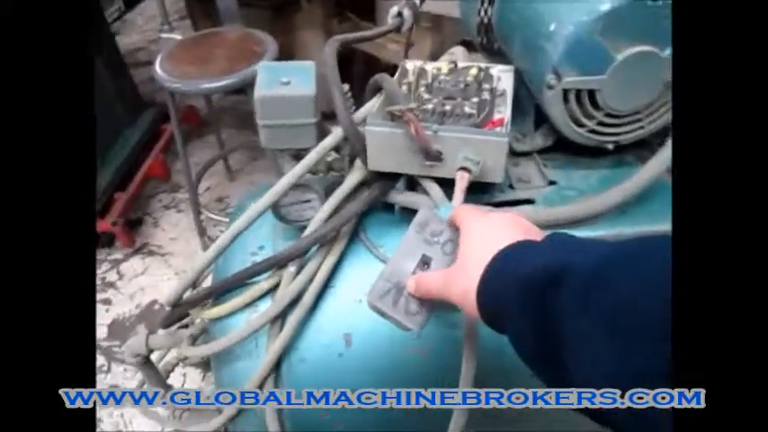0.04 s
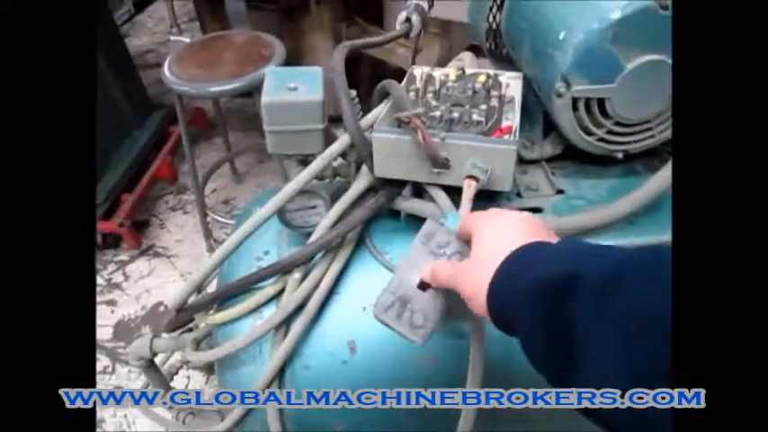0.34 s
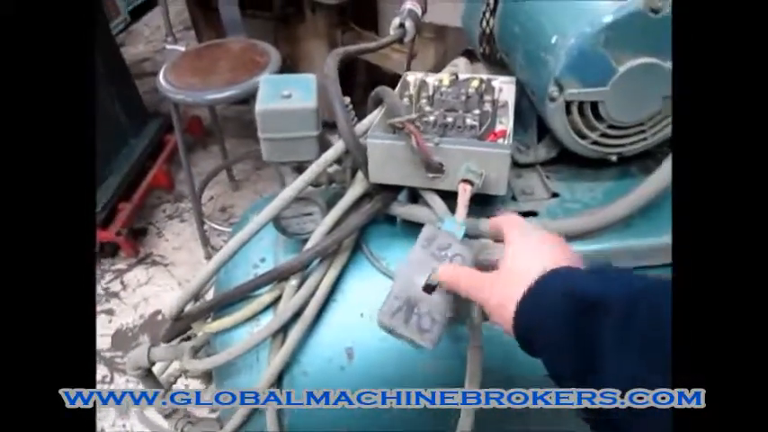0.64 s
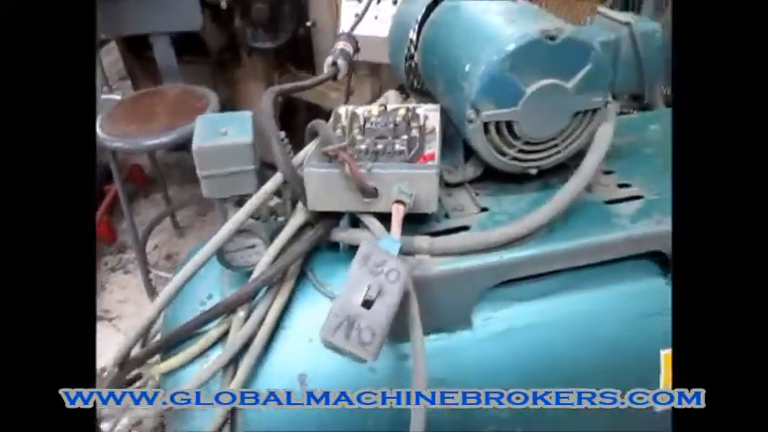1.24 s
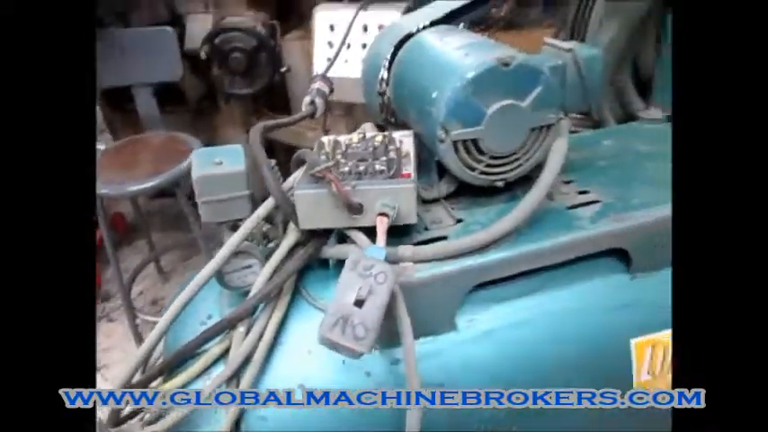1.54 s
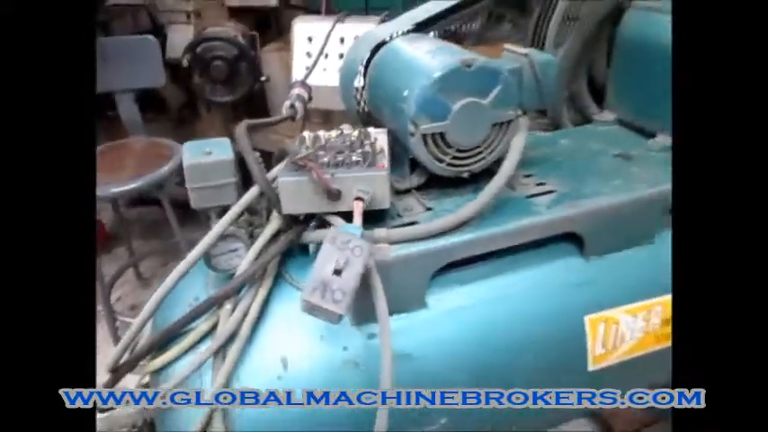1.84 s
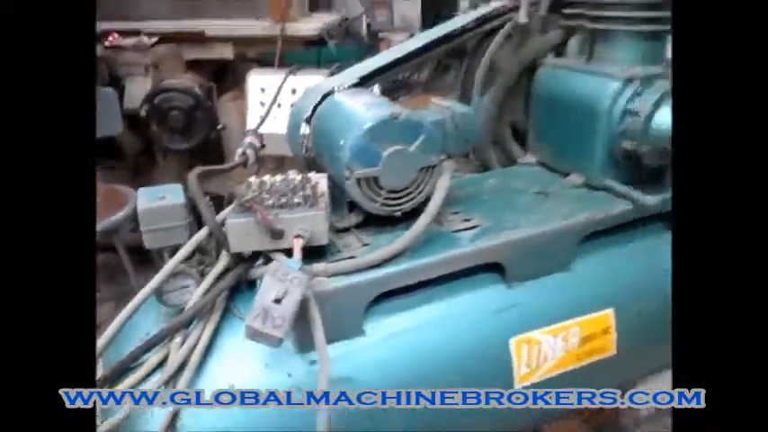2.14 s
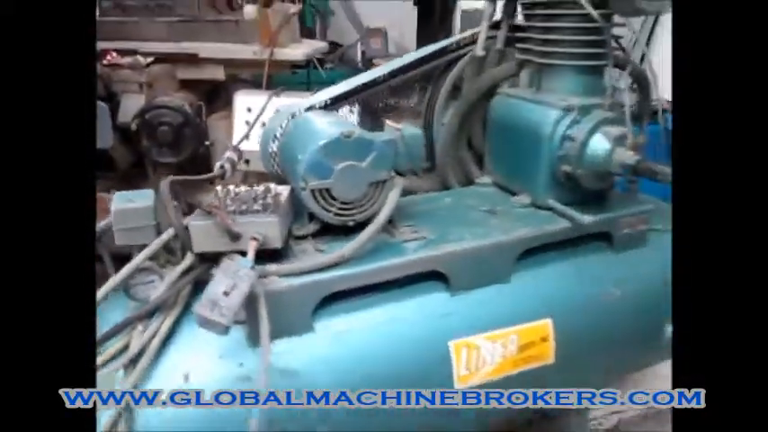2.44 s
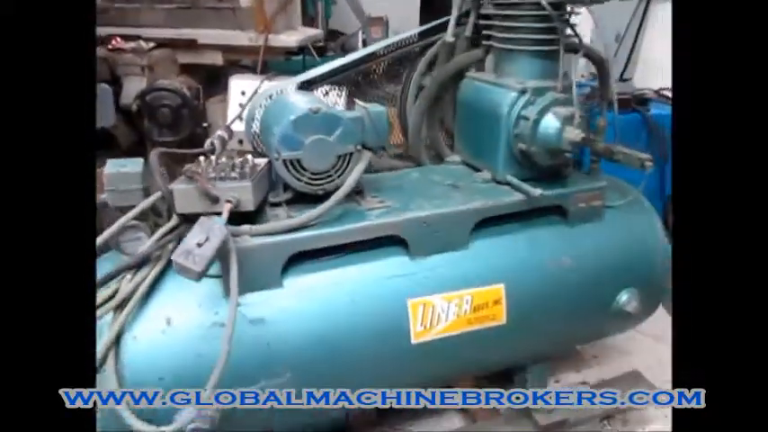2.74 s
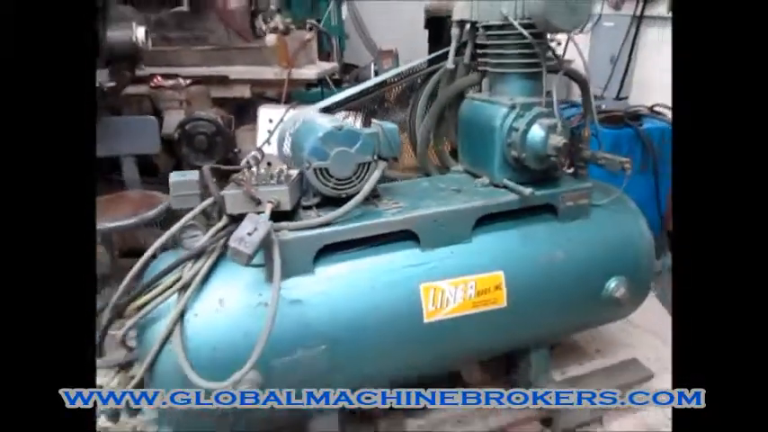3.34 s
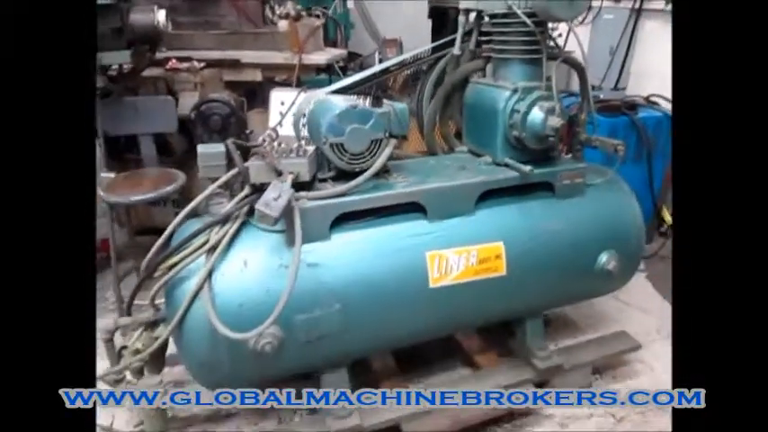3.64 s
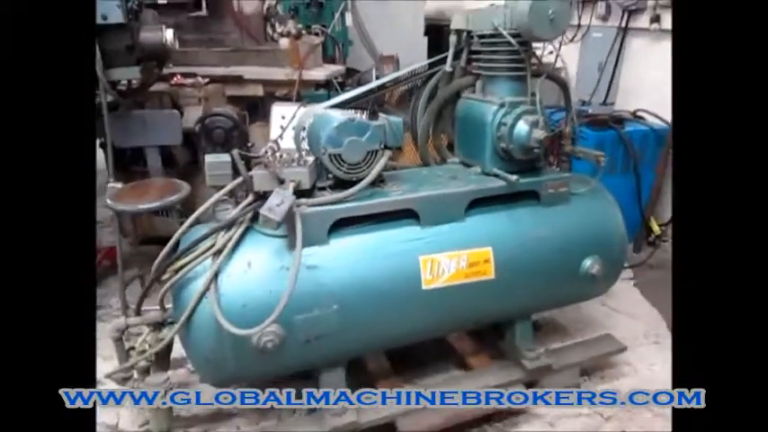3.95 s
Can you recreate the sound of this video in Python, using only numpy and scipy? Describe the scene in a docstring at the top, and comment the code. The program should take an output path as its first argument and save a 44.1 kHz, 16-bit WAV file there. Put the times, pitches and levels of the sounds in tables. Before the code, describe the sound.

An air compressor chugs, is switched off, then lets out a long hiss of air.

```python
"""In a workshop, a belt-driven air compressor chugs: each pump stroke thumps, knocks and rings the tank,
while the motor whines, the drive rattles and the valves tick. The switch snaps off and the strokes slow.
The unloader valve clacks open and lets the air out, its hiss falling in pitch as the pressure drops.
The pump groans as it stalls, and a mains hum comes up near the end."""
import sys
import numpy as np
from scipy import signal
from scipy.fft import rfft, irfft
from scipy.io import wavfile
from scipy.ndimage import uniform_filter1d, map_coordinates

SR = 44100
rng = np.random.default_rng(int(sys.argv[2]) if len(sys.argv) > 2 else 0)


def materialize(psi):
    """Save the field psi as 16-bit PCM at rate SR to the path in sys.argv[1].

    A 1-D psi becomes a single channel; in a 2-D psi each row is a channel.
    """
    bounded = np.clip(np.atleast_2d(psi).T, -1, 1)
    quanta = np.round(bounded * 32767).astype(np.int16)
    wavfile.write(sys.argv[1], SR, quanta)


N = 176400
T = np.arange(N) / SR

# pump strokes (time [s], air thump [dB], tank ring [dB], knock [dB])
STROKES = [(.0078, -10.5, -16, -18), (0.1155, -11.5, -19.5, -18), (.2237, -12.5, -16, -19.5),
           (0.333, -23, -24, -31), (0.4484, -15.5, -17, -31), (0.5811, -12, -11.5, -22),
           (0.7389, -9, -21.5, -23), (0.825, -18, -35, -38), (0.94, -20.5, -42, -36),
           (1.057, -24, -37, -38), (1.27, -22.5, -50, -38)]
# tone of the knock, then the filter over the whole stroke (frequency [Hz], level [dB])
KNOCK_TONE = [(150, 9.5), (500, -9.5), (1100, 2), (1700, -9), (2500, -1.5), (4200, -15), (6000, -30),
              (15000, -28.5)]
STROKE_FILTER = [(25, -19), (60, 0.5), (115, 0), (170, -1.5), (260, -0.5), (1000, 3)]
# loudness of the moving parts (time [s], rumble [dB], clatter [dB])
GEAR_LEVELS = [(0, -27, -33.5), (.315, -30.5, -37.5), (.35, -37.5, -42), (.43, -36.5, -40.5),
               (.47, -31.5, -38), (.555, -33.5, -37.5), (.6, -27.5, -36.5), (.83, -30.5, -32.5),
               (.91, -31, -31), (1.06, -36, -37.5), (1.2, -42, -34), (1.31, -41, -48), (1.42, -54, -58),
               (1.8, -52, -75), (4, -97, -90)]
# their tones (frequency [Hz], level [dB])
RUMBLE_TONE = [(30, -40), (70, -14), (115, -1), (190, -7.5), (270, -8.5), (400, -7), (540, 3), (700, -1.5),
               (1000, -1.5), (1270, -9.5), (1450, -39), (3000, -30), (15000, -70)]
CLATTER_TONE = [(500, -18), (1400, 1), (2300, 5), (3100, -7), (4300, 0.5), (5500, -8.5), (6100, -12.5),
                (7500, -15.5), (9000, -24), (13400, -26), (15000, -38)]
# notes the tank rings at (frequency [Hz], width [Hz], level against the rumble [dB])
TANK_NOTES = [(510, 14, -10.5), (562.4, 7.7, -10), (698, 8.9, -18.5), (808, 20, -19), (1234, 9.8, -12),
              (2256, 28, -24), (4230, 140, -21), (5470, 120, -19.5)]
# motor whine (frequency [Hz], level [dB])
MOTOR_NOTES = [(563, -39), (813, -44), (932, -38), (1054, -35), (3624, -55)]
# drive rattles, valve ticks, switch snaps and unloader clacks (time [s], level [dB])
RATTLES = [(.053, -24), (.145, -25), (.162, -32), (.272, -25), (.377, -31), (.496, -29), (.633, -23),
           (.653, -30), (.819, -26), (1.045, -25), (1.665, -40)]
TICKS = [(.0827, -24.5), (.191, -26.5), (.2992, -27.5), (.4115, -35.5), (.5397, -34), (.6898, -27.5),
         (.7277, -31), (.8774, -24.5)]
SNAPS = [(0.318, -16), (0.3266, -21.5)]
CLACKS = [(.9225, -18), (.944, -32), (.957, -16.5), (1.303, -25.5)]
# the tone of each (frequency [Hz], level [dB])
RATTLE_TONE = [(70, -18), (150, -2), (350, 3.5), (600, 7), (1200, -3), (1700, -11), (5000, -15),
               (7500, -21), (9000, -32), (15000, -42)]
TICK_TONE = [(1000, -45), (3000, -5), (3700, 3), (4400, 4), (5300, -10), (9000, -21), (11000, -13),
             (13400, -13), (14500, -28)]
SNAP_TONE = [(400, -11), (1300, -3), (2150, -8), (3300, -1), (4400, -3.5), (5500, -7.5), (6400, -12),
             (9000, -15.5), (11000, -24), (15000, -37)]
CLACK_TONE = [(300, -15), (900, -8), (1400, 2), (2300, -8), (3200, -17), (8000, -44), (15000, -60)]
# ring of the switch box (frequency [Hz], level against the snap [dB], fade time [s])
SWITCH_NOTES = [(1820, -10, .007), (4850, -9, .007), (7120, -21, .005)]
# escaping air (time [s], jet pitch [Hz], jet [dB], hiss [dB], low band [dB], high band [dB], sizzle [dB])
VENT_FLOW = [(.93, 5750, -33, -42, -36, -34.5, -43), (1.1, 5700, -35, -34, -40, -38, -44.5),
             (1.27, 5620, -32.5, -30, -53, -32, -46), (1.42, 5750, -30, -36, -40.5, -30, -44.5),
             (1.62, 6100, -29, -34, -42.5, -36, -46.5), (1.89, 5970, -29.5, -31, -46, -36.5, -46.5),
             (1.95, 5650, -32.5, -30, -35.5, -32, -49), (2.3, 5060, -31, -29, -35, -32, -50),
             (2.55, 4800, -29, -29.5, -34.5, -33, -49), (2.8, 4410, -29.5, -28.5, -34, -35, -46),
             (3.05, 4050, -27.5, -29, -33.5, -38.5, -47), (3.3, 3920, -29, -29.5, -33.5, -38, -47),
             (3.65, 3650, -32.5, -30, -33, -39, -46), (4, 3900, -42, -32.5, -37, -41, -49)]
# pitch of the bands either side of the jet (time [s], low band [Hz], high band [Hz])
VENT_BANDS = [(1, 1430, 6530), (1.35, 1820, 6520), (1.5, 1850, 6260), (1.8, 1730, 6770), (2.05, 1504, 6600),
              (2.5, 1460, 6410), (3.15, 1420, 6250), (3.6, 1543, 6330), (4, 1660, 6400)]
# tones of the broad hiss and the sizzle (frequency [Hz], level [dB])
HISS_TONE = [(100, -23), (400, -20), (700, -10.5), (1100, -4.5), (2100, -2.5), (2800, 2), (3300, -2),
             (4100, 2), (5200, -4.5), (6700, -9.5), (7400, -14.5), (8500, -17), (12000, -44)]
SIZZLE_TONE = [(5000, -18), (7500, 1.5), (8500, -4), (10200, -4), (11000, 3), (11700, -8.5), (12800, -16),
               (14500, -17), (15500, -10.5)]
# peaks and dips the vent pipe adds (frequency [Hz], width [Hz], level [dB])
PIPE_PEAKS = [(3300, 150, -1), (3570, 110, 0), (3830, 250, -1.5), (4420, 220, -3.5), (4980, 290, 4),
              (5650, 310, -1.5)]
# echoes off the tank and pump (first delay [s], last delay [s], level [dB])
ECHOES = [(.0021, 0.0038, -24), (.0046, 0.006, -15), (.0083, 0.0093, -15.5), (0.0131, 0.0151, -10.5)]
# groan of the stalling pump (time [s], pitch [Hz], level [dB])
GROAN = [(1.25, 150, -54), (1.275, 139, -34), (1.31, 119.6, -46), (1.37, 95, -36), (1.405, 122.4, -28.5),
         (1.44, 139, -37.5), (1.475, 123.8, -37.5), (1.52, 122, -59), (1.6, 127, -54), (1.85, 124, -74)]
# its tones at 1, 2, 3 and 4 times the pitch (level [dB])
GROAN_HARMONICS = [4, -4, -26, -25]
# workshop hum (time [s], mains note [dB], octave above [dB], low drone [dB])
HUM_LEVELS = [(2.5, -79, -74, -66), (2.85, -49, -48.5, -50.5), (2.94, -63, -59.5, -47),
              (3.01, -52, -41.5, -47), (3.2, -52, -45, -43.5), (3.6, -47, -45, -45.5),
              (4, -46.5, -50, -51.5)]
# tones of the drone and the quiet background (frequency [Hz], level [dB])
DRONE_TONE = [(30, -26), (65, -18), (78, -13), (92, -0.5), (130, -9), (180, -12.5), (275, -11.5),
              (450, -17.5), (780, -12), (1200, -30), (2000, -52)]
BACKGROUND_TONE = [(20, -22), (60, -21), (130, -5), (300, -3), (600, -7.5), (2000, -9.5), (15000, -42)]
# how long the room rings (frequency [Hz], time to fade by 60 dB [s])
ROOM_FADE = [(100, 0.44), (600, 0.48), (4000, 0.2), (15000, .12)]
# stereo width (frequency [Hz], level [dB])
STEREO_WIDTH = [(100, -90), (600, -85), (1200, -73), (2200, -70), (4000, -22.5), (15000, -14)]


def amp(db):
    """Turns decibels into a volume factor."""
    return 10 ** (np.asarray(db) / 20)


def unit(x):
    """Scales a sound to an average power of 1."""
    return x / np.sqrt(np.mean(x ** 2) + 1e-20)


def value_at(table, hz):
    """Looks up a frequency table, gliding between rows by musical pitch."""
    f, value = np.transpose(table)
    return np.interp(np.log(hz + 1), np.log(f + 1), value)


def curves(table, t=T):
    """Joins the rows of a time table into one curve per column."""
    times, *columns = np.transpose(table)
    return [np.interp(t, times, column) for column in columns]


def tint(x, tone):
    """Turns each frequency up or down by a tone table."""
    return irfft(rfft(x) * amp(value_at(tone, np.fft.rfftfreq(N, 1 / SR))), N)


def noise(tone):
    """Steady noise with this tone."""
    return unit(tint(rng.standard_normal(N), tone))


def band(hz, width):
    """Noise around one pitch; at 0 Hz, a random wobble."""
    f = np.fft.rfftfreq(N, 1 / SR)
    return unit(irfft(rfft(rng.standard_normal(N)) / (1 + (2 * (f - hz) / width) ** 2), N))


def hump(hz, centre, octaves):
    """A broad, rounded peak around one pitch."""
    return (1 + (np.log2((hz + 1) / centre) / octaves) ** 2 / 2) ** -2


def strike(start, fade_s, rise_s=0.00046):
    """The loudness of a hit: it jumps up, then dies away."""
    age = np.maximum(T - start, 0)
    return (1 - np.exp(-age / rise_s)) * np.exp(-np.minimum(age / fade_s, 60))


def hits(rows, tone, fade_s):
    """Short bursts of noise that share one tone."""
    return noise(tone) * sum(amp(db) * strike(s, fade_s) for s, db in rows)


def pump(thump_hz=188, ring_hz=557, boom_hz=124.7):
    """Each stroke knocks, gulps air with a thump, rings the tank and leaves the intake booming."""
    knocks = [(s - 0.0032, db) for s, _, _, db in STROKES]  # just ahead of each thump
    out = hits(knocks, KNOCK_TONE, fade_s=0.0036)
    for s, thump_db, ring_db, _ in STROKES:
        age = T - s
        spread = np.minimum((np.pi * thump_hz * age) ** 2, 60)
        gulp = (2 * spread - 1) * np.exp(-spread)  # one dip in pressure between two small bumps
        boom = amp(-23) * strike(s, 0.063, rise_s=.004) * np.sin(2 * np.pi * boom_hz * age)
        ring = 2 * strike(s - 0.0016, 0.0052, rise_s=0.0026) * np.sin(2 * np.pi * ring_hz * age)
        out += amp(thump_db) * (gulp + boom) + amp(ring_db) * ring
    return tint(out, STROKE_FILTER)


def running_gear():
    """Belt, flywheel and bearings rumble, clatter and keep the tank ringing until they stop."""
    rumble_db, clatter_db = curves(GEAR_LEVELS)
    rumble = noise(RUMBLE_TONE) * amp(-0.5)
    tank = sum(amp(db) * band(hz, width) for hz, width, db in TANK_NOTES)
    clatter = noise(CLATTER_TONE) * amp(clatter_db + 1.4 * band(0, 150))
    return (rumble + tank) * amp(rumble_db) + clatter


def motor(off_s=0.31, fade_s=0.022, waver=0.004):
    """A wavering whine that dies when the power is cut."""
    whine = 0
    for hz, db in MOTOR_NOTES:
        pitch = hz * (1 + waver * band(0, 30))
        whine += amp(db) * np.sin(2 * np.pi * np.cumsum(pitch) / SR)
    return np.sqrt(2) * whine * np.exp(-np.maximum(T - off_s, 0) / fade_s)


def drive_rattles():
    """Loose parts of the drive rattle."""
    return hits(RATTLES, RATTLE_TONE, fade_s=0.015)


def valve_ticks():
    """The pump's valves tick between strokes."""
    return hits(TICKS, TICK_TONE, fade_s=.007)


def switch():
    """The contacts snap twice and ring their box."""
    ring = sum(amp(db + note_db) * strike(s, fade_s) * np.sin(2 * np.pi * hz * (T - s))
               for s, db in SNAPS for hz, note_db, fade_s in SWITCH_NOTES)
    return hits(SNAPS, SNAP_TONE, fade_s=0.0046) + np.sqrt(2) * ring


def unloader_clacks():
    """The valve that frees the trapped air clacks open."""
    return hits(CLACKS, CLACK_TONE, fade_s=0.008)


def vent(open_s=.928, spits_per_s=13):
    """Air jets out, fluttering and spitting; its pitch sinks as the pressure drops."""
    hz, t, grid = signal.stft(rng.standard_normal(N), SR, nperseg=1024, noverlap=768)
    hz = hz[:, None]  # the grid holds noise by frequency (rows) and time (columns)
    jet_hz, *levels_db = curves(VENT_FLOW, t)
    low_hz, high_hz = curves(VENT_BANDS, t)
    pipe = amp(sum(db * np.exp(-(2 * (hz - f) / width) ** 2) for f, width, db in PIPE_PEAKS))
    jet = hump(hz, jet_hz, octaves=0.23) / (1 + (hz / 7300) ** 20)
    layers = [jet, amp(value_at(HISS_TONE, hz)), hump(hz, low_hz, octaves=0.25),
              hump(hz, high_hz, octaves=0.094), amp(value_at(SIZZLE_TONE, hz))]
    power = sum((layer * pipe * amp(db)) ** 2 / np.mean((layer * pipe) ** 2, 0)
                for layer, db in zip(layers, levels_db))
    patches = uniform_filter1d(rng.standard_normal(grid.shape), size=4, axis=0)
    patches_db = 0.9 * unit(uniform_filter1d(patches, size=30, axis=1))  # the tone shifts at random
    # evenly spaced peaks sound hollow and slide down with the jet
    hollow_db = 1.4 * np.cos(2 * np.pi * 4 * hz / jet_hz) * hz ** 2 / (hz ** 2 + 2500 ** 2)
    shaped = grid * np.sqrt(power) * amp(patches_db + hollow_db)
    air = signal.istft(shaped, SR, nperseg=1024, noverlap=768)[1][:N]
    spit_starts = 1. * (rng.random(N) < spits_per_s / SR)
    spits_db = 3 * signal.fftconvolve(spit_starts, np.hanning(int(0.0052 * SR) + 1), "same")
    flutter_db = 0.63 * band(0, 122)
    gush_db = 10.5 * strike(open_s, fade_s=0.011)
    opening = np.clip((T - open_s) / 0.0022, 0, 1)
    return air * amp(flutter_db + spits_db + gush_db) * opening


def with_echoes(x):
    """Echoes off the tank and pump slowly lag further behind, shifting the tone at a steady loudness."""
    echoes = sum(amp(db) * map_coordinates(x, [(T - np.linspace(first, last, N)) * SR], order=3)
                 for first, last, db in ECHOES)
    return (x + echoes) / np.sqrt(1 + sum(amp(db) ** 2 for _, _, db in ECHOES))


def groan():
    """A pump valve flutters as the last air is drawn through it."""
    hz, db = curves(GROAN)
    phase = 2 * np.pi * np.cumsum(hz * (1 + 0.015 * band(0, 86))) / SR
    voice = sum(amp(level) * np.sin(k * phase) for k, level in enumerate(GROAN_HARMONICS, 1))
    return amp(db) * unit(voice)


def hum(mains_hz=60):
    """Mains electricity hums over a low drone from the workshop."""
    mains_db, octave_db, drone_db = curves(HUM_LEVELS)
    phase = 2 * np.pi * mains_hz * T
    notes = amp(mains_db) * np.sin(phase) + amp(octave_db) * np.sin(2 * phase)
    return np.sqrt(2) * notes + amp(drone_db) * noise(DRONE_TONE)


def room(x):
    """The workshop adds scattered echoes whose high notes die first."""
    length = SR // 2
    echoes = rng.standard_normal(length) * (rng.random(length) < .1) * (T[:length] > .004)
    hz, t, grid = signal.stft(echoes, SR, nperseg=256)
    fade = amp(-60 * t / value_at(ROOM_FADE, hz)[:, None])
    tail = signal.istft(grid * fade, SR, nperseg=256)[1]
    return signal.fftconvolve(x, tail / np.linalg.norm(tail))[:N]


def scene():
    """Mixes every sound in the middle, with a little stereo width in the high notes."""
    impacts = pump() + valve_ticks() + drive_rattles() + switch() + unloader_clacks()
    middle = impacts + amp(-11) * room(impacts)
    middle += running_gear() + motor() + groan() + with_echoes(vent()) + hum()
    middle += amp(-53.5) * noise(BACKGROUND_TONE)
    side = tint(room(middle), STEREO_WIDTH)
    return np.array([middle + side, middle - side])


def record(dry):
    """Cuts the very highest notes and shifts the wave slightly off zero."""
    cutoff_hz, offset = 15780, .0127
    low_pass = signal.firwin(1023, cutoff_hz, window=("kaiser", 9), fs=SR)
    return offset + signal.oaconvolve(dry, low_pass[None], "same")


dry = scene()
out = record(dry)
materialize(out)
```